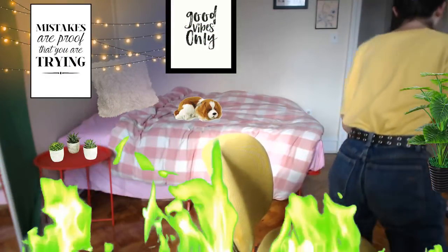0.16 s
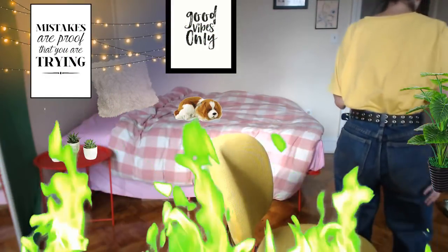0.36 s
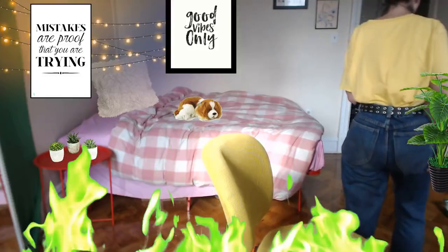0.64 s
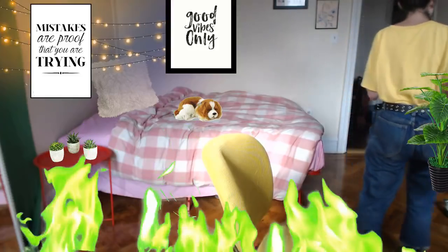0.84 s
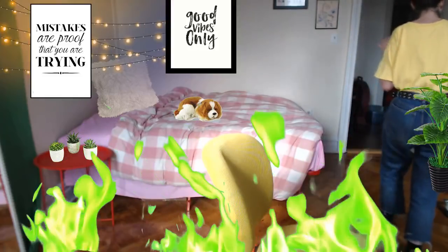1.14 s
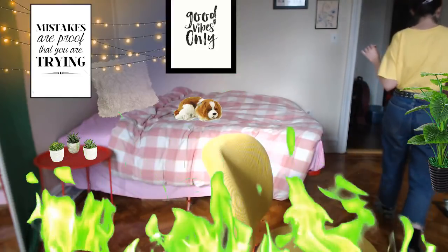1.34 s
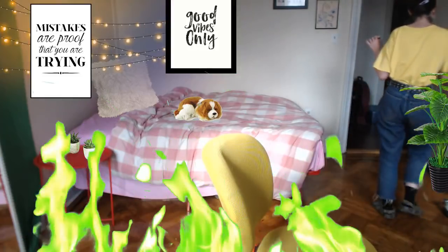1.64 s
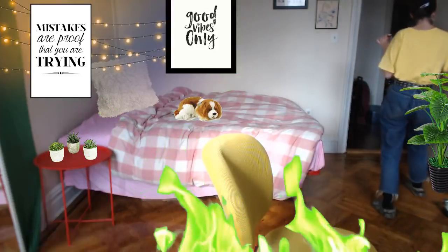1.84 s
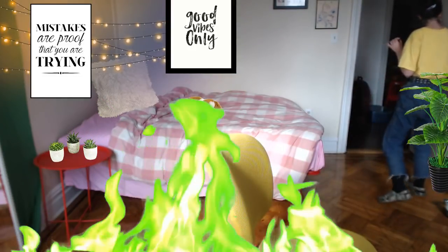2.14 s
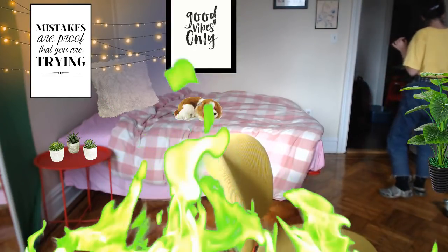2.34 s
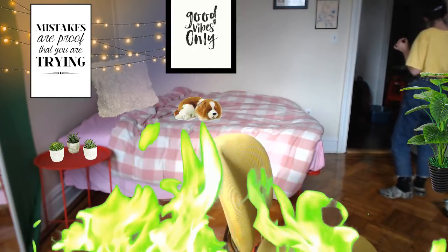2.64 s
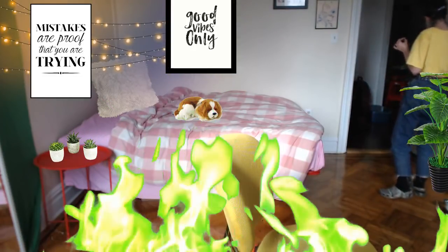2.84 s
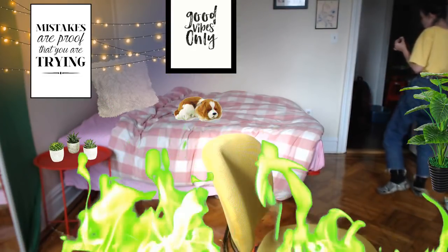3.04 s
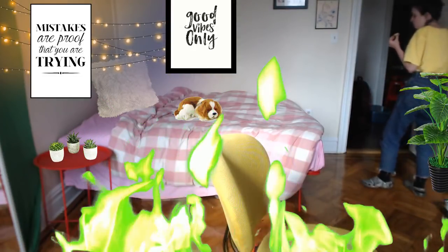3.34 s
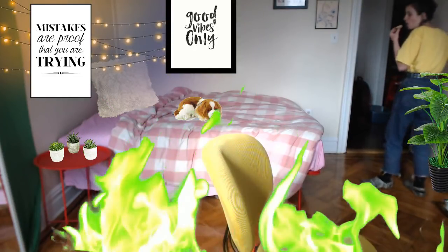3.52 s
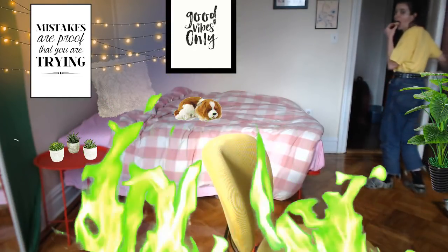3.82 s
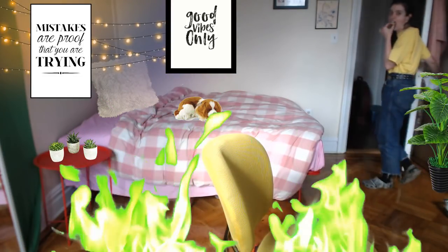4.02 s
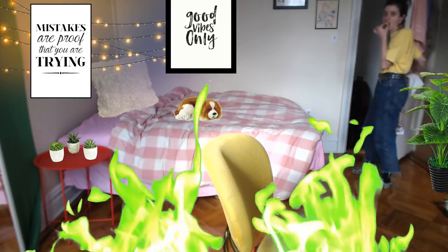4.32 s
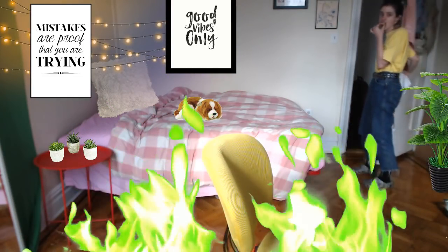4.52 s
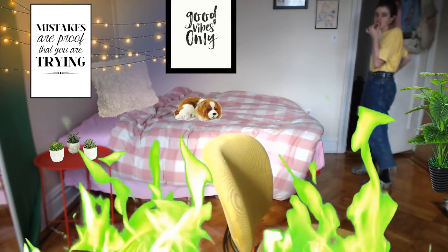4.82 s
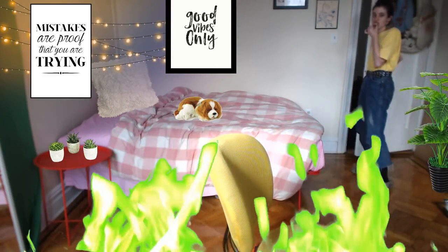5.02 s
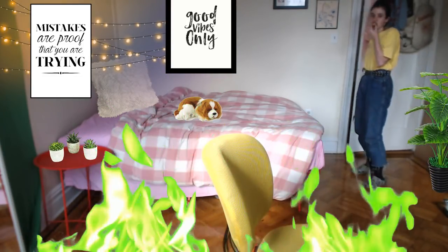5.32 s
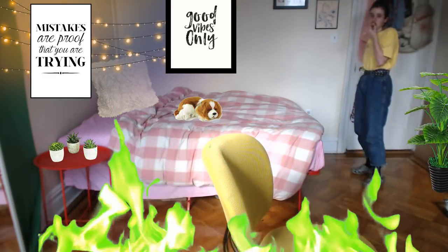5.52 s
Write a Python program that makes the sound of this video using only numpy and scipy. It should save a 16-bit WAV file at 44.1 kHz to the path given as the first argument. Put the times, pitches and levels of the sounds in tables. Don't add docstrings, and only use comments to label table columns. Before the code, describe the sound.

In a quiet bedroom with faint rumble, hiss and a barely audible hum, someone in soft slippers moves over parquet. A tiny knock opens the scene, then soft steps and scuffs at 0.6 to 0.9 s. Busier, heavier steps fall between 1.2 and 2.0 s, with dull board thuds, small creaks and gritty sliding, strongest near 1.7 s; lighter heel knocks follow until 2.4 s. Handle knocks come at 2.8 and 2.9 s, then a bright metallic latch snap at 3.03 s with a thin ring. Small ticks and faint scuffs lead to another sharp latch clack at 4.0 s and a brief rustle. A raspy, stuttering hinge creak runs from 4.34 to 4.66 s, with two slow slips, then a crisp click at 4.75 s. After near silence, the door slams at 5.45 s, hard and woody, with a low boom and slight rattle, before the sound ends abruptly.

```python
import sys
import numpy as np
from scipy import signal
from scipy.fft import rfft, irfft, next_fast_len
from scipy.io import wavfile
from scipy.ndimage import uniform_filter1d

SR = 44100
rng = np.random.default_rng(int(sys.argv[2]) if len(sys.argv) > 2 else 0)


def natural_amplitude(level_db):
    exponent = np.asarray(level_db, float) / 20
    return 10 ** exponent


def pcm_store(signal):
    levels = np.round(np.clip(np.atleast_2d(signal), -1, 1) * 32767)
    wavfile.write(sys.argv[1], SR, levels.astype(np.int16).T)


N = 249940
LEAD_SAMPLES = 512
LEAD_S = LEAD_SAMPLES / SR
GRIT_SPREAD = 0.23

# start_s, snap_db (above 6 kHz), boards_db, knock_db, clack_db
STEPS = [(0.0014, -52, -63, -55.5, -60), (0.628, -62, -59, -56, -71), (0.6563, -58, -65.5, -83, -77),
         (0.7923, -56, -63, -60.5, -69.5), (1.168, -42, -50, -66, -102), (1.3297, -37, -50, -60, -58.5),
         (1.4558, -38, -67, -66, -63), (1.608, -66, -84, -88, -77), (1.684, -33, -50, -47, -57.5),
         (1.804, -57, -51.5, -52.5, -73), (1.8874, -53, -85, -64, -79.5), (1.9787, -58, -90, -60, -57),
         (2.0128, -46.5, -58.5, -53.5, -59), (2.2435, -35.5, -61, -51.5, -54),
         (2.3266, -53.5, -63, -53.5, -58), (2.366, -70, -61.5, -51.5, -51.5),
         (3.3936, -71, -61.5, -82, -70.5), (3.427, -68, -64, -94, -77)]
# start_s, snap_db, boards_db, knock_db, clack_db
SLAM = [
    (5.449, -16, -34.5, -32, -28.5),
]
# pitch_hz, density_db_per_hz
THUMP = [(29, -44), (50, -15), (92, -9), (161, -5.5), (215, 3.5), (257, 0), (305, -8), (340, -4),
         (380, -12), (490, -12.5), (840, -120)]
# pitch_hz, density_db_per_hz
CLACK = [(760, -17), (1300, -11), (1840, -5.5), (1930, -0.5), (2200, -5.5), (2520, -0.5), (3100, -8),
         (4030, -14), (6820, -120)]
# pitch_hz, density_db_per_hz
CLICK = [(1710, -74), (2900, -2), (3420, -0.5), (3830, -0.5), (4800, 3), (5190, -1), (6100, 0),
         (7930, -4.5), (13400, -120)]
# pitch_hz, density_db_per_hz
HINGE_BODY = [(180, -45), (300, -11.5), (500, -16), (750, -5), (1000, -6), (1300, -0.5), (1560, -9.5),
              (2300, -3.5), (3190, -1.5), (6200, -5.5), (7820, -3.5), (15000, -13.5), (16000, -20)]


def noise(n):
    return rng.standard_normal(n)


def colour(x, points):
    hz, db = np.transpose(points)
    n = next_fast_len(len(x))
    grid_hz = np.maximum(np.arange(n // 2 + 1) * SR / n, 1)
    gain_db = np.interp(np.log(grid_hz), np.log(hz), db, left=-80, right=-80)
    y = irfft(rfft(x, n) * natural_amplitude(gain_db), n)[:len(x)]
    return y / np.sqrt(np.mean(y ** 2))


def band(x, lo_hz, hi_hz):
    sos = signal.butter(2, [lo_hz, min(hi_hz, .45 * SR)], "band", fs=SR, output="sos")
    return signal.sosfilt(sos, x)


def curve(table, k):
    return np.interp(np.arange(N) / SR, [row[0] for row in table], [row[k] for row in table])


def window(table, tail_s):
    t = np.arange(N) / SR
    opening = np.clip((t - table[0][0]) / 0.0062, 0, 1)
    return opening * np.exp(-np.maximum(t - table[-1][0], 0) / tail_s)


def add(out, start_s, x, db):
    start = int(start_s * SR)
    i = max(start, 0)
    x = x[i - start:][:N - i]
    loudest = np.sqrt(uniform_filter1d(x ** 2, size=441).max())
    out[i:i + len(x)] += x * natural_amplitude(db) / loudest


def rings(modes, t):
    luck = rng.standard_normal((len(modes), 2))
    total = 0
    for (hz, db, t60_s), (a, b) in zip(modes, luck):
        tone = np.sin(2 * np.pi * hz * (1 + 0.015 * b) * t)
        total = total + natural_amplitude(db + 0.68 * a) * tone * 0.00077 ** (t / min(t60_s, .7))
    return total


def room(points, t60_s, hold_s, build_s, direct):
    t = np.arange(int(.3 * SR)) / SR
    suppressor = 1 / (1 + (t / hold_s) ** 6)
    echo = noise(len(t)) * (1 - np.exp(-t / build_s)) * 10 ** (-3 * t / t60_s) * suppressor
    echo *= natural_amplitude(0.81 * colour(noise(len(t)), [(30, 0.023), (250, 0.0048)]))
    echo[0] += direct
    return colour(np.roll(echo, LEAD_SAMPLES), points)


def blow(out, row, body, t60_s, hold_s, build_s, direct):
    # pitch_hz, density_db_per_hz
    snap_points = [(3530, -61), (6000, 2.5), (7400, -4.5), (8850, -1), (13400, -2), (15600, -7),
                   (16300, -32)]
    start_s, snap_db, *body_db = row
    click_db = body_db[-1] + 0.54 * (snap_db - body_db[-1]) - 10
    layers = zip((*body, CLICK, snap_points), (*body_db, click_db, snap_db - 15))
    for k, (points, db) in enumerate(layers):
        lasts_s = hold_s[k] * np.clip((db + 87.5) / 45, .4, 1.3)
        layer = room(points, t60_s[k], lasts_s, build_s[k], direct * (k > 0))
        add(out, start_s - LEAD_S, layer, db - 0.5 * (k == 0))


def ticks(out, table, spread):
    for start_s, db, hz, lasts_s in table:
        ring = [(hz * (1 - 1.5 * spread), -30), (hz * (1 - spread / 2), 0),
                (hz * (1 + spread / 2), 0), (hz * (1 + 1.5 * spread), -30)]
        tick = room(ring, t60_s=3.44 * lasts_s, hold_s=3.1 * lasts_s, build_s=0.0013, direct=3.3)
        add(out, start_s - LEAD_S, tick, db)


def bare_clicks(out, table, points, direct=1.6):
    for start_s, db in table:
        click = room(points, t60_s=.008, hold_s=.004, build_s=.0003, direct=direct)
        add(out, start_s - LEAD_S, click, db - 21)


def patchy(x, db, wide, long):
    spec = signal.stft(x, nperseg=256)[2]
    field = uniform_filter1d(rng.standard_normal(spec.shape), size=wide, axis=0)
    field = uniform_filter1d(field, size=long, axis=1)
    field = field - uniform_filter1d(field, size=7, axis=0)
    field *= np.minimum(np.arange(len(field)) / 8, 1)[:, None]
    return signal.istft(spec * natural_amplitude(db * field / field.std()), nperseg=256)[1][:len(x)]


def air():
    # time_s, gain_db
    gate = [(0.0, 6.5), (0.58, -2.5), (1.77, 3), (1.86, 9), (2.05, 0.5), (3.92, -0.9), (4.17, 7.5),
            (4.62, 10), (4.91, 3.5), (5.48, -2), (5.67, -17)]
    # pitch_hz, density_db_per_hz
    rumble_points = [(35, -53), (60, -17.5), (124, -5), (221, -10), (243, -7.5), (365, -15.5), (395, -16),
                     (794, -12.5), (981, -22), (1400, -24.5), (1820, -22), (3080, -120)]
    # pitch_hz, density_db_per_hz
    hiss_points = [(760, -38), (1300, -4), (1340, -8), (2370, -1), (2630, -6), (3960, -12), (6220, -12),
                   (14300, -13.5), (16000, -18)]
    # pitch_hz, level_db
    hum_tones = [(44, -82.5), (120, -74.5), (163, -76.5)]
    t, hum = np.arange(N) / SR, 0
    for hz, db in hum_tones:
        waver_db = 0.25 * colour(noise(N), [(1, 0.015), (6, 0.0033)])
        hum = hum + natural_amplitude(db + waver_db) * np.sin(2 * np.pi * hz * t)
    gate_db = curve(gate, 1)
    rumble = colour(noise(N), rumble_points) * natural_amplitude(-69.5 + 0.58 * gate_db)
    hiss = colour(noise(N), hiss_points) * natural_amplitude(-71 + gate_db)
    return rumble + hiss + hum


def boom():
    # pitch_hz, level_db, t60_s
    modes = [(42.3, -39, 0.93), (84.4, -39, 0.95), (97.3, -38.5, 0.85), (110.6, -36.5, 0.97),
             (152, -37.5, 0.59), (172.3, -37.5, 0.58), (215.7, -35.5, 0.34), (351.4, -41.5, 0.34),
             (436, -50, 0.18), (543, -41.5, 0.5), (579, -38, 0.4), (653, -41, 0.35), (969, -44, 0.4),
             (700, -49, 0.65)]
    t, total = np.maximum(np.arange(N) / SR - SLAM[0][0], 0), 0
    for k, (hz, db, t60_s) in enumerate(modes):
        total = total + (-1) ** k * natural_amplitude(db) * np.sin(2 * np.pi * hz * t) * 0.0014 ** (t / t60_s)
    return total * (1 - np.exp(-t / 0.015))


def small_parts(out):
    # start_s, level_db, ring_hz, lasts_s
    creaks = [(.49, -69.5, 790, 0.09), (1.248, -64, 1290, 0.071), (1.332, -57.5, 1230, 0.068),
              (1.89, -56, 796, 0.13), (2.013, -56.5, 1290, 0.02), (0, -59.5, 4960, 0.049),
              (0, -64, 7360, 0.029), (1.184, -59.5, 5170, 0.036), (2.768, -58.5, 4980, 0.036),
              (2.768, -58, 3500, 0.024)]
    # start_s, level_db, ring_hz, lasts_s
    metal = [(2.585, -73.5, 9350, 0.03), (2.869, -58, 8410, 0.042), (2.873, -60, 10570, 0.028),
             (2.955, -71, 13600, .04), (3.044, -41, 10900, 0.058), (3.478, -67, 4000, 0.049),
             (3.495, -64, 7700, 0.017), (3.82, -71, 11600, .02), (3.82, -73, 15000, .02),
             (3.916, -50, 6700, 0.06), (3.922, -53, 8450, 0.038)]
    # start_s, level_db, ring_hz, lasts_s
    crushed = [(0, -54.5, 2240, 0.025), (.648, -59.5, 3240, 0.039), (.72, -68, 4860, .03),
               (1.41, -61.5, 4800, 0.11), (.73, -62, 13800, 0.018), (1.606, -64, 4550, 0.078),
               (1.71, -51.5, 2140, 0.11), (1.806, -53.5, 2130, 0.27), (2.775, -51.5, 10600, 0.032),
               (2.952, -66.5, 3140, 0.098), (2.953, -54, 9900, 0.048), (3.041, -41.5, 2480, 0.077),
               (3.495, -56.5, 15100, .04), (3.509, -57.5, 8500, 0.031), (3.625, -62.5, 8650, 0.029),
               (5.187, -70, 13100, .018), (5.301, -72, 13000, 0.017)]
    ticks(out, creaks, spread=0.13)
    ticks(out, metal, spread=0.06)
    ticks(out, crushed, GRIT_SPREAD)


def loose_wood(out):
    # start_s, level_db, ring_hz, lasts_s
    bumps = [(0, -50.5, 139, 0.079), (0, -47, 428, 0.022), (.645, -57, 416, 0.051), (.864, -68, 200, 0.036),
             (1.336, -49.5, 415, 0.034), (1.696, -56, 238, 0.026), (1.73, -46, 122.5, 0.107),
             (1.82, -52, 233, 0.028), (1.2, -57, 209, 0.048), (2.869, -48.5, 740, 0.021)]
    # start_s, level_db, ring_hz, lasts_s
    panels = [(1.203, -65, 630, 0.023), (1.332, -59.5, 563, .025), (1.695, -60, 590, .03),
              (1.805, -57, 627, 0.018), (1.827, -56, 700, .02), (1.718, -56, 240, .03),
              (1.758, -55, 200, 0.027), (1.204, -56, 208.4, 0.034), (1.379, -53, 282, .015),
              (1.983, -56, 870, 0.025), (2.023, -54.5, 703, 0.027), (2.256, -55.5, 722, 0.051),
              (2.39, -53.5, 696, 0.029), (2.375, -52, 2620, 0.037), (2.775, -48.5, 2280, 0.015),
              (2.777, -51, 690, 0.032), (2.871, -54.5, 4860, 0.064), (2.881, -45.5, 2500, 0.044),
              (2.899, -50.5, 1950, 0.022), (2.952, -61, 3200, .025), (2.771, -55.5, 1326, 0.013),
              (3.495, -68, 2350, 0.088), (3.985, -55, 1950, 0.034), (4.029, -34.5, 2560, 0.062),
              (4.03, -52, 737, 0.064), (4.756, -47, 2380, 0.064), (5.454, -39, 1060, 0.024),
              (5.455, -35, 1510, 0.013)]
    # start_s, level_db, ring_hz, lasts_s
    rattle = [(3.038, -43.5, 4570, 0.078), (3.041, -45.5, 3180, 0.075), (.655, -59.5, 4050, .03),
              (1.688, -55, 3250, 0.052), (4.026, -46, 6300, .05), (3.045, -50.5, 1960, 0.077),
              (.79, -61, 7800, 0.024), (2.768, -51, 10000, .006), (2.776, -58, 15000, .025),
              (3.045, -62.5, 1250, .025), (5.452, -32, 12300, 0.045), (5.54, -40, 11000, .03),
              (1.5, -62, 2500, 0.015)]
    ticks(out, bumps, spread=0.38)
    ticks(out, rattle, GRIT_SPREAD)
    ticks(out, panels, spread=0.11)


def boards(out):
    # pitch_hz, level_db, t60_s
    modes = [(121.4, -8.5, 1.0), (180.7, -8, 0.64), (226, 3.5, 0.3), (282.8, 2.5, 0.3)]
    t = np.arange(SR // 4) / SR
    shape = (1 - np.exp(-t / 0.011)) / (1 + (t / 0.17) ** 4)
    for start_s, _, boards_db, *_ in STEPS:
        add(out, start_s, rings(modes, t) * shape, boards_db + 0.5)


def thuds(out):
    # start_s, level_db, ring_hz, swell_s
    flexes = [(.622, -61, 720, .003), (.634, -48.5, 438, .003), (.658, -54, 270, .005),
              (.736, -62, 190, 0.0056), (.778, -58, 200, .007), (.796, -54.5, 241, .004),
              (.865, -59, 220, 0.0031), (1.688, -47, 270, .004), (1.698, -40.5, 235, 0.0035),
              (1.724, -44.5, 198, 0.0049), (1.743, -43, 254, 0.0048), (1.761, -43, 211, 0.0032),
              (1.778, -50, 125, 0.011), (1.811, -44, 640, 0.0022), (1.821, -45, 250, .004),
              (1.829, -51, 640, .003), (1.846, -49.5, 238, .007), (2.798, -53, 617, 0.0044),
              (5.468, -41, 94, .007), (5.528, -42, 120, .01), (5.456, -42, 140, .007),
              (5.457, -38, 570, 0.007), (5.47, -41.5, 248, 0.0081), (1.17, -49.5, 210, .004),
              (1.183, -43, 214, 0.0056), (1.212, -44, 215, 0.0058), (1.241, -51.5, 200, 0.0035),
              (1.197, -56, 630, 0.0033), (1.249, -68, 1270, 0.0034), (1.331, -40.5, 215.6, 0.0057),
              (1.381, -49, 250, 0.0028), (1.331, -56.5, 1250, .005), (1.351, -57, 1270, .008),
              (2.872, -45, 700, 0.0045)]
    t = np.arange(SR // 8) / SR
    for start_s, db, hz, swell_s in flexes:
        add(out, start_s, np.sin(2 * np.pi * hz * t) * t / swell_s * np.exp(-t / swell_s), db)


def contacts(out):
    # start_s, peak_db
    sharp = [(1.335, -37), (1.4555, -34), (2.768, -30), (1.608, -48), (1.812, -38), (3.9844, -29),
             (4.7501, -22), (4.762, -16)]
    # start_s, peak_db
    bright = [(3.0295, -46), (3.033, -20), (3.0512, -20), (5.5411, -27), (4.049, -24), (4.081, -28),
              (0.7395, -38), (0.6412, -40), (1.405, -40)]
    # start_s, peak_db
    wooden = [(5.4545, -16), (5.4585, -11), (5.462, -17), (2.259, -43), (2.376, -43), (2.029, -45)]
    bare_clicks(out, sharp, [(900, -3), (2500, -10), (9000, 1), (16000, -5)])
    bare_clicks(out, bright, [(4000, -32), (7000, 1), (9000, 3), (16000, 2)], direct=5)
    bare_clicks(out, wooden, [(400, -30), (1000, -20), (2500, 7), (5000, 0.5), (16000, -17)])


def grit(points):
    flicker_db = colour(noise(N), [(15, -15), (300, -29)])
    return colour(noise(N) * natural_amplitude(flicker_db), points)


def scuffs():
    # start_s, rise_s, fall_s, hiss_db, fineness_db
    slides = [(.15, 0.069, 0.18, -74, -5), (.621, 0.03, 0.08, -57.5, 6), (.68, 0.049, 0.049, -63.5, 0),
              (.77, 0.018, 0.12, -69, -5), (1.164, 0.016, 0.065, -59, 11.5),
              (1.252, 0.049, 0.071, -53, 11.5), (1.396, 0.022, 0.072, -52.5, 4),
              (1.453, 0.0035, 0.053, -57.5, 13), (1.598, 0.0079, 0.027, -62.5, 3.5),
              (1.683, 0.031, 0.11, -45.5, 4.5), (1.801, 0.082, 0.058, -57, -9),
              (1.95, 0.039, 0.067, -66.5, -7), (2.16, 0.089, 0.032, -61, 0.5), (2.3, 0.072, 0.12, -76, -3),
              (3.3, 0.011, .04, -80, 2), (3.385, 0.011, 0.076, -71.5, 3), (3.82, 0.0044, 0.069, -80.5, -11),
              (3.891, 0.03, .008, -64, -1), (3.99, 0.017, .012, -65, 16), (4.007, 0.023, 0.011, -35.5, 1),
              (4.235, 0.065, 0.037, -52.5, -1.5), (4.223, 0.016, 0.076, -58, 12)]
    # pitch_hz, density_db_per_hz
    hiss_points = [(3530, -24.5), (6000, -5), (6460, 0.5), (7850, 1), (8850, 5), (9850, 6), (11200, 2.5),
                   (14600, -9), (22000, -120)]
    # pitch_hz, density_db_per_hz
    sizzle_points = [(6350, -13.5), (10800, -4.5), (13100, -1.5), (15100, 2), (15600, -5), (16300, -27)]
    rise_db, fall_db = 17.5, 17
    hiss, sizzle, rub, coarse = grit(hiss_points), grit(sizzle_points), grit(CLICK), grit(CLACK)
    t, out = np.arange(N) / SR, 0
    for start_s, rise_s, fall_s, db, fine_db in slides:
        late_s = t - start_s - rise_s
        fade_db = np.maximum(-late_s / rise_s * rise_db, late_s / fall_s * fall_db)
        fade_db = fall_db * np.minimum(fade_db / fall_db, 10) ** 1.55
        on = np.clip((t - start_s) / 0.0012, 0, 1) * natural_amplitude(db - fade_db)
        rub_gain = natural_amplitude(-3 - 0.73 * fine_db + 0.081 * fade_db)
        coarse_gain = natural_amplitude(-9.5 - 0.65 * fine_db + 0.23 * fade_db)
        out = out + on * (hiss + natural_amplitude(fine_db) * sizzle + rub_gain * rub + coarse_gain * coarse)
    return out


def footsteps(out):
    # pitch_hz, density_db_per_hz
    knock = [(190, -39), (330, -11), (491, -2.5), (640, 0.5), (867, -4), (969, -13), (1280, -11.5),
             (1450, -24), (1880, -37), (3190, -120)]
    for row in STEPS:
        blow(out, row, (THUMP, knock, CLACK), t60_s=(0.38, 0.19, 0.18, 0.22, 0.14),
             hold_s=(0.097, 0.15, 0.36, 0.22, 0.26),
             build_s=(0.0067, 0.0066, 0.0051, 0.0014, 0.0022), direct=2.5)


def handle_and_latch(out):
    # start_s, snap_db, boards_db, knock_db, clack_db
    latch = [(2.7664, -49, -56.5, -53.5, -55), (2.8681, -51, -62.5, -45, -49),
             (3.031, -19.5, -64, -65.5, -78), (3.9223, -47.5, -70, -48.5, -57),
             (3.9809, -33.5, -82, -81, -48.5), (4.025, -16.5, -59, -40, -34),
             (4.7486, -24.5, -55.5, -49, -40.5)]
    # pitch_hz, density_db_per_hz
    knock = [(190, -29), (330, -17), (491, -6), (640, 3), (760, -3.5), (880, -6), (1000, -16), (1280, -5.5),
             (1500, -36), (3190, -120)]
    for row in latch:
        blow(out, row, (THUMP, knock, CLACK), t60_s=(1.0, 0.27, 0.44, 0.53, 0.29),
             hold_s=(0.13, 0.31, 0.13, 0.11, 0.086),
             build_s=(0.014, 0.0072, 0.0023, 0.0014, 0.0071), direct=0.44)


def plate(out):
    # pitch_hz, level_db, t60_s
    modes = [(2470, 0, .3), (2910, -2.5, 0.39), (4650, -4, .4), (6500, -6, .45), (9600, -3.5, .35),
             (11000, 1, 0.4), (11300, -6, .4), (12900, -4, .35)]
    # start_s, level_db
    blows = [(3.036, -42), (4.027, -50), (4.752, -57)]
    t = np.arange(SR // 4) / SR
    shape = (1 - np.exp(-t / 0.01)) / (1 + (t / 0.11) ** 6)
    for start_s, db in blows:
        ring = 0
        for mode in modes:
            waver_db = 4.0 * colour(noise(len(t)), [(15, 4.0), (120, -3)])
            ring = ring + rings([mode], t) * natural_amplitude(waver_db)
        add(out, start_s, ring * shape, db)


def hinge():
    # time_s, level_db
    loudness = [(4.341, -40), (4.36, -46), (4.49, -45), (4.55, -46.5), (4.643, -46), (4.66, -48)]
    # start_s, level_db
    jolts = [(4.34, -3), (4.347, -2.5), (4.363, 2), (4.383, 1.5), (4.401, -12), (4.407, -0.5), (4.427, 2),
             (4.449, 1.5), (4.459, -9), (4.472, -0.5), (4.49, -10), (4.503, 2), (4.526, -4), (4.535, 2.5),
             (4.551, 3), (4.568, 2), (4.588, 3), (4.611, 1.5), (4.626, -4), (4.638, 0)]
    # pitch_hz, half_width_hz, level_db
    resonances = [(820, 150, -2), (1270, 77, -4), (2890, 60, -7), (3240, 55, -8), (5270, 390, -4),
                  (7700, 430, -2), (9100, 190, 1), (11600, 160, -8)]
    on = window(loudness, .001) > .5
    jolt = 0
    for start_s, db in jolts:
        late = np.maximum(np.arange(N) / SR - start_s, 0) / 0.0046
        jolt = jolt + natural_amplitude(db) * late * np.exp(-late)
    leaf = colour(jolt * noise(N), HINGE_BODY)
    leaf = leaf + 0.53 * sum(natural_amplitude(db) * band(leaf, hz - w, hz + w) for hz, w, db in resonances)
    t = np.arange(SR // 5) / SR
    echo = noise(len(t)) * 0.0011 ** (t / 0.18)
    wet = band(signal.fftconvolve(leaf, echo)[:N], 630, 13700)
    treble = band(leaf, 9100, 19000)
    mix = 0.97 * treble / leaf.std() + 0.59 * leaf / leaf.std() + 0.84 * wet / wet.std()
    return mix / mix[on].std() * natural_amplitude(curve(loudness, 1)) * window(loudness, 0.039)


def last_slips(out):
    # start_s, level_db
    slips = [(4.672, -48.5), (4.715, -51.5)]
    for start_s, db in slips:
        slip = room(HINGE_BODY, t60_s=0.11, hold_s=0.052, build_s=0.0078, direct=0)
        add(out, start_s - LEAD_S, slip, db)


def slam(out):
    # pitch_hz, density_db_per_hz
    door_thump = [(24, -40), (50, -5), (96, -4.5), (135, -7), (216, -13), (249, -12.5), (324, -16),
                  (356, -20), (380, -17.5), (490, -47), (840, -120)]
    # pitch_hz, density_db_per_hz
    leaf_layers = [
        [(190, -25), (330, -11.5), (355, -11.5), (484, -3), (640, 0), (810, -6.5), (1450, -7), (1880, -24), (3190, -120)],
        [(790, -39), (1350, -10.5), (1560, -12.5), (1830, -6.5), (2570, -7.5), (3100, -12), (4030, -18), (6820, -120)],
    ]
    knock, clack = leaf_layers
    blow(out, SLAM[0], (door_thump, knock, clack), t60_s=(0.94, 0.48, 0.46, 0.49, 0.54),
         hold_s=(0.14, 0.18, 0.16, 0.14, 0.12),
         build_s=(0.012, 0.0033, 0.0016, 0.0012, 0.00021), direct=0)
    frame_points = knock[:-2] + clack[2:-1] + [(9000, -14.0), (16000, -10.5)]
    frame = room(frame_points, t60_s=0.053, hold_s=0.024, build_s=0.0005, direct=0.3)
    add(out, SLAM[0][0] + 0.004 - LEAD_S, frame, -25)


def scene():
    walk, door, small, tick = np.zeros((4, N))
    footsteps(walk)
    handle_and_latch(door)
    small_parts(tick)
    for source in (slam, last_slips, boards, loose_wood, contacts, thuds, plate):
        source(small)
    walk = patchy(walk + scuffs(), 3.92, wide=3, long=8)
    door = patchy(door, 2.8, wide=2, long=24)
    tick = patchy(tick, 3.7, wide=2, long=12)
    return (walk + door + tick + small + air() + boom() + hinge())[None]


def low_pass(x):
    return signal.sosfilt(signal.butter(12, 16810, fs=SR, output="sos"), x)


def record(dry):
    x = dry - .5 * band(dry, 5300, 7000)
    x = signal.sosfilt(signal.ellip(8, .2, 32, 15900, fs=SR, output="sos"), x)
    x = x * np.clip((N - np.arange(N)) / (0.0015 * SR), 0, 1)
    return low_pass(x)


dry = scene()
out = record(dry)
pcm_store(out)
```